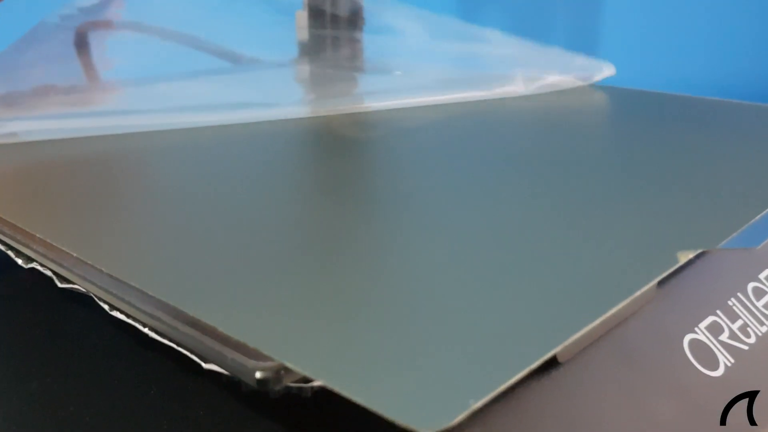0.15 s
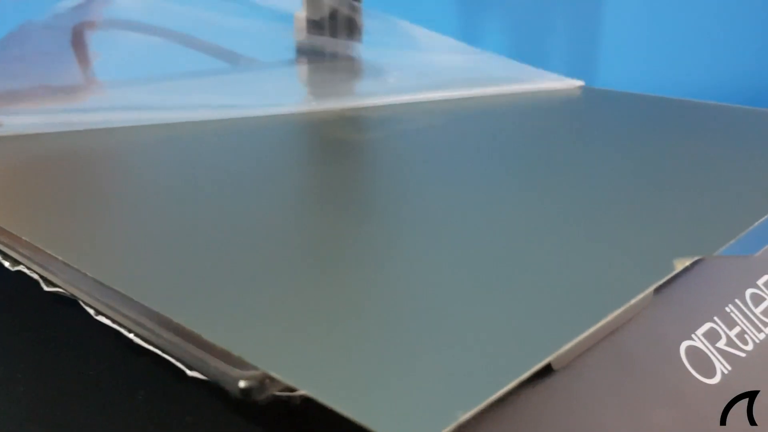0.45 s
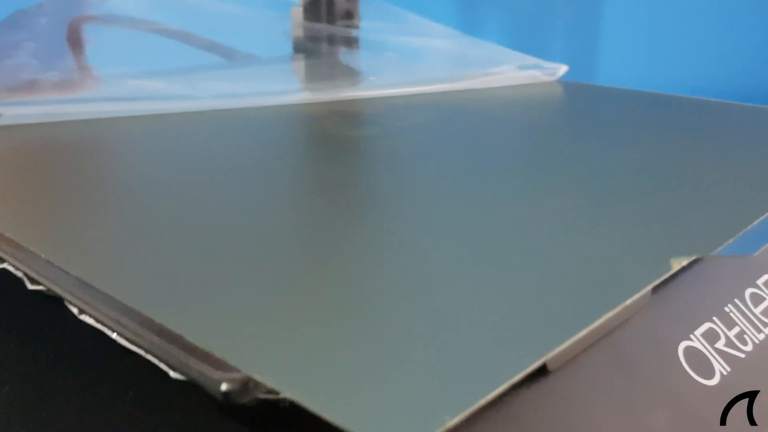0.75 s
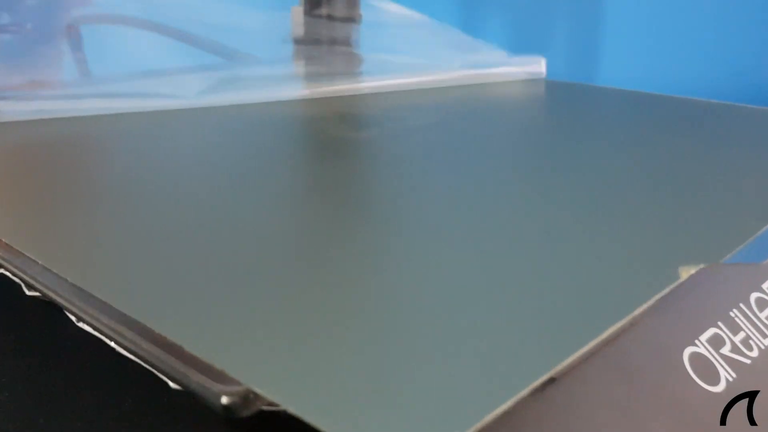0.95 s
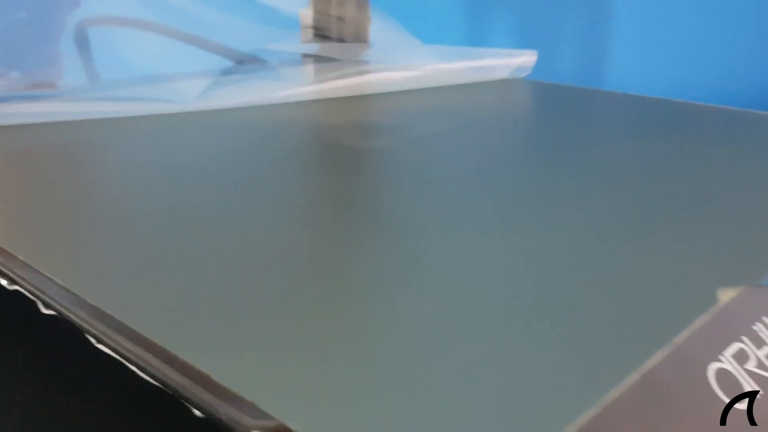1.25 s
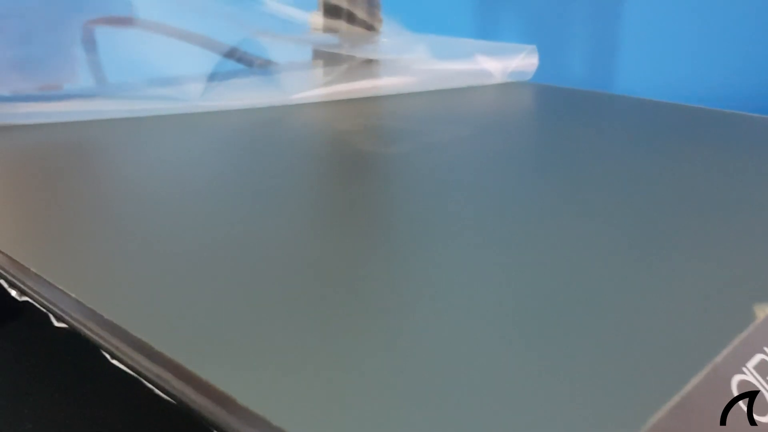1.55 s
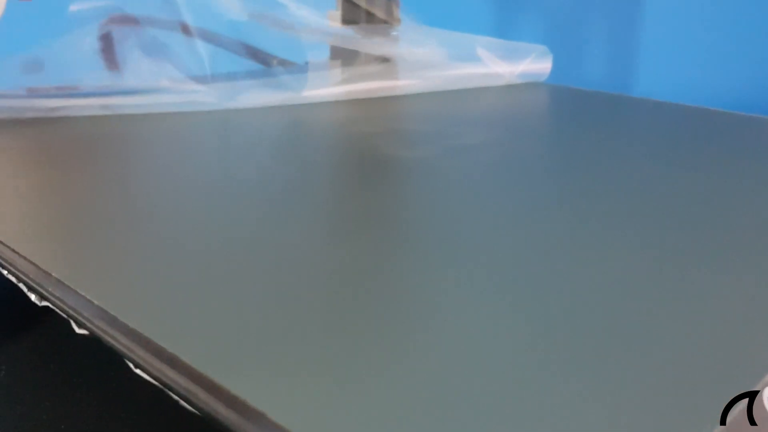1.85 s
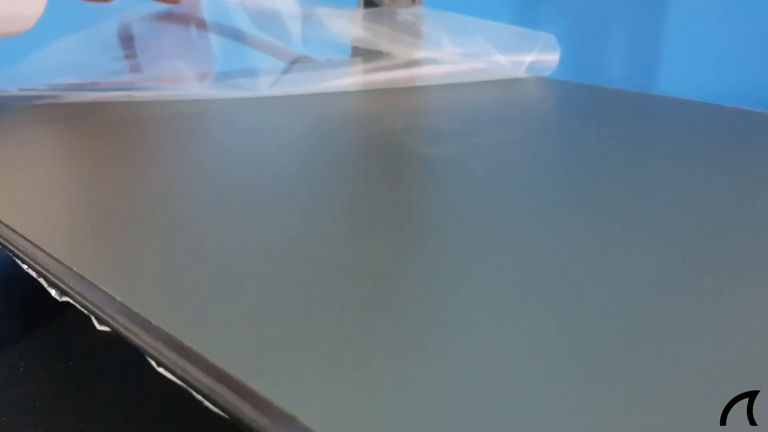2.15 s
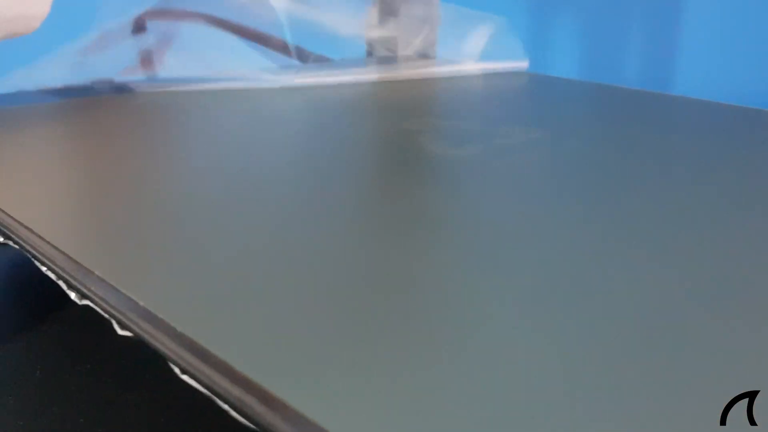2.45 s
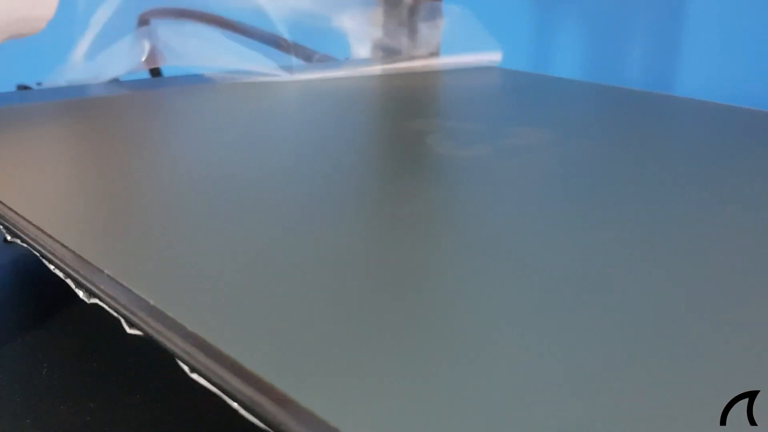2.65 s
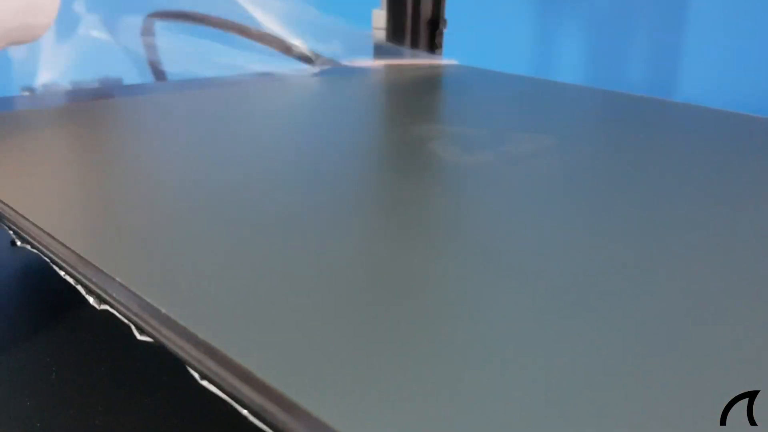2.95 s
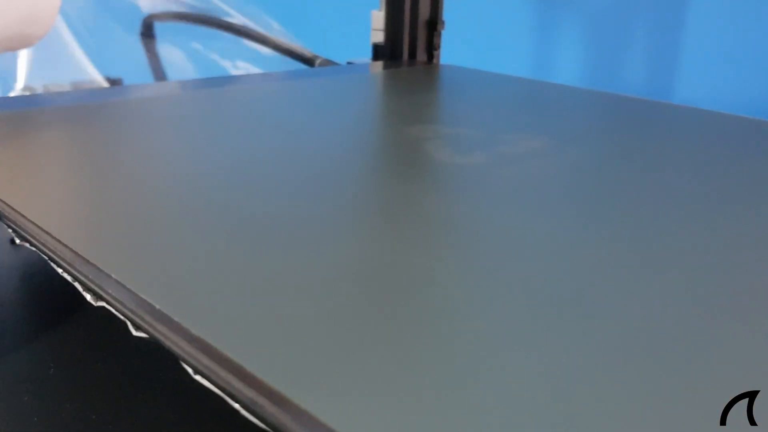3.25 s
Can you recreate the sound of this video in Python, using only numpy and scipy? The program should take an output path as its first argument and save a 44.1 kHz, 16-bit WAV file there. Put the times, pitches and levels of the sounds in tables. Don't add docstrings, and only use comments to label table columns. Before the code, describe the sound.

Thin plastic film peels off a metal sheet, close up in a small, quiet, slightly echoing room. From 0 to 1.1 s, faint hiss comes in short spurts with bright little snaps. It nearly stops around 1.2-1.6 s, then a rapid chatter of clicks comes near 1.85 s. From 2.2 to 3.1 s, peeling grows louder, crackly and rustling, with faint soft thumps; it eases before a sharp final crackle at 3.3 s.

```python
import sys
import numpy as np
from scipy import signal
from scipy.fft import rfft, irfft, next_fast_len
from scipy.io import wavfile
from scipy.ndimage import map_coordinates

SR = 44100
rng = np.random.default_rng(int(sys.argv[2]) if len(sys.argv) > 2 else 0)


def how_loud(loudness_db):
    steps = np.asarray(loudness_db, float) / 20
    return 10 ** steps


def output_pcm(signal):
    pcm = np.clip(np.atleast_2d(signal).T, -1, 1) * 32767
    wavfile.write(sys.argv[1], SR, np.round(pcm).astype(np.int16))


N = 149940

# pitch_hz, level_db
AIR_COLOUR = [(20, -11.5), (75, 5), (160, -1), (400, -6), (700, -9.5), (1500, -14), (5000, -42),
              (16000, -53)]
# pitch_hz, time to fall 60 dB_s
ROOM_DECAY = [(200, 0.36), (2000, 0.44), (12000, 0.41)]
# peak_s, peak_db, pitch_hz,
# length_cycles
THUMPS = [(.012, -48, 130, 3), (1.022, -46, 72, 3), (.222, -47, 800, 6), (.55, -48, 210, 4),
          (.035, -52, 250, 8), (.546, -47, 520, 2), (1.868, -42, 370, 5), (2.993, -35, 320, 7),
          (2.835, -40, 300, 8), (2.865, -43, 210, 4), (3.03, -41, 260, 5), (2.8, -52, 70, 3),
          (1.406, -46, 1000, 8), (2.25, -44, 330, 6)]
# time_s, pull_db, freed flap_db
PULL = [(0, -48, -23), (.3, -45.5, -26), (.47, -49.5, -14), (.69, -51.5, -15), (.78, -45, -28),
        (1.02, -49, -9.5), (1.2, -71, -15), (1.26, -60, -4), (1.58, -62.5, -5), (1.68, -54.5, -18),
        (1.96, -49.5, 1), (2.2, -41, -6.5), (2.45, -37.5, -4), (2.86, -35, -2), (3.08, -41.5, -5.5),
        (3.3, -55, 0.5), (3.335, -48, -25), (3.37, -41.5, -17)]
# start_s, length_s, buckling_db, hiss_db
SPURTS = [(0.039, 0.011, -41.5, -43), (0.139, 0.024, -49, -43.5), (0.248, 0.017, -47, -40),
          (0.282, 0.063, -41, -42.5), (0.5, 0.063, -41.5, -37.5), (0.898, 0.026, -37, -41),
          (1.054, 0.056, -39.5, -44.5), (1.107, .09, -40.5, -55), (1.392, 0.02, -38, -44.5),
          (1.64, 0.25, -41, -75), (1.822, 0.058, -35.5, -41.5), (2.095, 0.064, -37, -46),
          (2.293, 0.088, -29.5, -36.5), (2.44, 0.015, -34, -59), (2.47, 0.022, -28, -31),
          (2.559, 0.055, -28.5, -34), (2.677, 0.048, -29.5, -37.5), (3.19, 0.026, -40, -55),
          (2.998, 0.03, -31, -38.5), (3.078, 0.089, -37.5, -59), (3.33, 0.022, -17.5, -37)]
JOLT_STARTS = [.192, .716, .818, .882, 1.048, 1.988, 2.225, 2.416, 2.765, 2.985, 3.19]
# length_s, buckling_db, hiss_db
JOLTS = [(0.029, -41.5, -45), (0.014, -58, -37.5), (0.017, -39, -38), (0.013, -41, -40.5),
         (0.0078, -40.5, -42), (0.087, -37.5, -38), (0.052, -32.5, -42), (0.0041, -25.5, -52),
         (.03, -36.5, -37.5), (0.007, -26, -40), (0.003, -33, -36)]
# start_s, length_s, level_db
SLACK = [
    (1.095, 0.055, -49.5),
    (1.4, 0.035, -55),
    (2.7, 0.057, -52),
    (2.81, 0.042, -48),
    (3.06, 0.061, -47),
    (3.176, 0.033, -41.5),
    (3.344, 0.016, -31.5),
]
# pitch_hz, level_db
SLACK_COLOUR = [(400, -24), (800, -7), (1150, 0), (1700, -3), (2600, -20)]
# pitch_hz, level_db
FLAP_COLOUR = [(70, -19.5), (150, -13), (330, 0.5), (600, -5.5), (1000, 3.5), (1450, -1.5), (2200, 3.5),
               (5000, -45)]
# pitch_hz, level_db
BUCKLE_COLOUR = [(500, -58.5), (1300, -9.5), (1750, -1), (2300, 0.5), (3200, -5.5), (4800, -3.5),
                 (7000, -17.5), (14000, -20)]
# pitch_hz, level_db
GLUE_COLOUR = [(400, -16), (1200, -46), (2300, 9), (3300, 3), (5500, 4), (7000, 3), (12000, -1.5),
               (16000, -3.5)]
# peak_s, peak_db, pitch_hz, length_cycles
SNAPS = [(.0492, -30, 2460, 5), (.1958, -30, 2300, 5), (.1990, -31, 2500, 5), (.2204, -23, 2300, 6),
         (.2631, -30, 2200, 4), (.2725, -31, 2400, 4), (.3123, -26, 2450, 3), (.5071, -27, 5400, 6),
         (.5171, -27, 2600, 6), (.5325, -27, 4300, 9), (.5455, -29, 2300, 6), (.5490, -27, 2300, 6),
         (.5548, -26, 5300, 12), (.7973, -28, 5350, 6), (.8836, -30, 6100, 5), (.8857, -28, 4050, 7),
         (.9095, -29, 2400, 6), (.9250, -28, 2300, 5), (.9320, -29, 2400, 5), (1.0502, -28, 4500, 7),
         (1.0539, -29, 2450, 5), (1.2967, -43, 2090, 5), (1.7489, -32, 2150, 5), (1.7688, -31, 2220, 5),
         (1.7836, -32, 4670, 6), (1.8282, -28, 2450, 3), (1.9266, -27, 2330, 3), (1.9382, -27, 1490, 4),
         (1.9781, -22, 1900, 2.5), (1.9912, -25, 4300, 4), (1.4058, -32, 2100, 6), (1.4064, -37, 4200, 6),
         (1.8099, -29, 2650, 3), (1.8122, -29, 2690, 3),
         (2.1770, -21, 1800, 3), (2.2259, -21, 3600, 3), (2.2268, -17, 2400, 7),
                (2.3335, -22, 2400, 5), (2.4177, -17, 4700, 4), (2.4182, -21, 1900, 3),
                (2.4349, -18.5, 2700, 3.5), (2.4529, -22, 2260, 6), (2.5061, -21, 6500, 8),
                (2.5382, -18, 4200, 4), (2.5395, -23, 3000, 4), (2.6060, -17, 5550, 9),
                (2.7055, -22, 2100, 6), (2.7334, -19, 2820, 7), (2.7550, -23, 5000, 8),
                (2.7675, -22, 2200, 5), (2.7765, -21, 6900, 12), (2.8305, -24, 1000, 4),
                (2.9115, -23, 4570, 4), (2.9863, -15, 2250, 3), (2.9885, -25, 1150, 6),
                (3.0720, -28, 1150, 7), (3.1090, -28, 1120, 4), (3.1200, -28, 2000, 5),
                (3.1329, -25, 5800, 6), (3.1490, -27, 2000, 6), (3.1715, -28, 4700, 6),
                (3.1922, -23, 1900, 3), (3.1935, -23, 5700, 8), (3.2000, -27, 1150, 7),
                (3.3072, -34, 4260, 5), (3.3139, -34, 1140, 4), (3.3145, -35, 4400, 8)]
# pitch_hz, level_db
SNAP_EDGE = [(300, -25), (900, -18), (2000, 6), (6000, 8), (9000, -58), (16000, -44)]
# pitch_hz, level_db
PORT_COLOUR = [(3000, -2.5), (3550, 2.5), (4100, 0), (6900, 1), (8000, -11), (8800, -6), (12500, 2.5),
               (15700, -1.5)]
# pitch_hz, level_db
LEFT_OVER_RIGHT = [(60, -1.5), (130, 2.5), (290, 2), (640, 1.5), (1410, -4), (3100, -5), (6820, -1.5),
                   (15000, -9)]

LAG_S, LAG_SPREAD_S = .0001, .00006
SNAP_LAG_S = .00004
RELEASE_S = 0.13


def unit(x):
    return x / np.sqrt(np.mean(x ** 2) + 1e-20)


def along(points, hz):
    f, v = np.transpose(points)
    return np.interp(np.log(hz + 1), np.log(f + 1), v)


def wobble(rate_hz):
    return map_coordinates(rng.standard_normal(4000), [np.arange(N) * min(rate_hz, 1000) / SR])


def coloured(x, points):
    log_gain = np.log(how_loud(along(points, np.fft.rfftfreq(4096, 1 / SR))))
    cepstrum = irfft(log_gain)
    cepstrum[1:2048] *= 2
    cepstrum[2049:] = 0
    response = irfft(np.exp(rfft(cepstrum)))
    return signal.fftconvolve(x, response[None], axes=1)[:, :N]


def slips(count, scatter_db, smear):
    at, place, sign, luck = rng.random((4, count))
    spread = LAG_SPREAD_S * np.sqrt(12) * (place - .5)
    half_lag = (LAG_S + spread) * SR / 2
    size_db = np.minimum(-scatter_db * np.log(luck + 1e-9), 4.0 * scatter_db)
    size = np.sign(sign - .5) * how_loud(size_db)
    pair = []
    for side in (1, -1):
        sample = np.clip(at * N + side * half_lag, 0, N - 1).astype(int)
        pair.append(np.bincount(sample, size, N))
    return unit(unit(np.array(pair)) + smear * rng.standard_normal((2, N)))


def rings(rows, crack):
    edge_s, sag = .012, 0.083
    out = np.zeros((2, N + SR))
    t = np.arange(SR // 8) / SR
    for peak_s, db, hz, cycles in rows:
        burst = how_loud(-60 * t / edge_s) * rng.standard_normal(len(t))
        edge = coloured(np.pad(burst[None], ((0, 0), (20, 0))), SNAP_EDGE)[0]
        lag_s = np.clip(rng.normal(SNAP_LAG_S, LAG_SPREAD_S / 2), -9 / SR, 9 / SR)
        swell_s = cycles / hz / 3
        start = max(round((peak_s - swell_s) * SR) - 10, 0)
        for port, late_s in enumerate([lag_s, 0]):
            since = np.maximum(t - 10 / SR - late_s, 0)
            u = since / swell_s
            swell = (np.e * u * np.exp(-u)) ** 2
            ring = swell * np.sin(2 * np.pi * hz * since * (1 + sag * (1 - u / 2) / 2))
            late_edge = edge[10 - round(late_s * SR):][:len(t)]
            out[port, start:][:len(t)] += how_loud(db) * (ring + crack * late_edge)
    return out[:, :N]


def air():
    shared, left, right = rng.standard_normal((3, N))
    sway_db = 2.5 * wobble(7)
    return how_loud(-63 + sway_db) * unit(coloured(np.array([left, right]) + shared, AIR_COLOUR))


def room(x):
    hop = SR // 5
    out = np.zeros((2, N + 2 * SR))
    fade = np.hanning(2 * hop + 1)[:-1]
    x = np.pad(x, ((0, 0), (hop, 2 * hop)))
    for at in range(0, N + hop, hop):
        hz, t, z = signal.stft(rng.standard_normal((2, SR // 3)), SR, nperseg=256)
        alike = np.exp(-hz / 1220)[:, None]
        z = np.array([z[0], alike * z[0] + np.sqrt(1 - alike ** 2) * z[1]])
        decay = how_loud(-60 * t / along(ROOM_DECAY, hz)[:, None])
        tail = signal.istft(z * decay, SR, nperseg=256)[1]
        tail = tail / np.linalg.norm(tail[0])
        wet = signal.fftconvolve(x[:, at:at + 2 * hop] * fade, tail, axes=1)
        out[:, at + 150:][:, :wet.shape[1]] += wet
    return out[:, hop:hop + N]


def sheet_thumps():
    return rings(THUMPS, crack=0)


def effort():
    t = np.arange(N) / SR
    time_s, pull_db, flap_db = np.transpose(PULL)
    pull = how_loud(np.interp(t, time_s, pull_db))
    jolts = [(start_s, *row) for start_s, row in zip(JOLT_STARTS, JOLTS)]
    start, length, buckle_db, hiss_db = np.transpose(SPURTS + jolts)[..., None]
    is_spurt = np.arange(len(start))[:, None] < len(SPURTS)
    rise_s = np.where(is_spurt, .5 * length, .0015)
    release = how_loud(-60 * np.maximum(t - start - length, 0) / RELEASE_S)
    shape = np.clip((t - start) / rise_s, 0, 1) * release
    hiss = np.sqrt((how_loud(6.5) * pull) ** 2 + ((how_loud(hiss_db + 5.0) * shape) ** 2).sum(0))
    buckle = np.sqrt((how_loud(-4.0) * pull) ** 2 + ((how_loud(buckle_db) * shape) ** 2).sum(0))
    flap = how_loud(np.interp(t, time_s, flap_db)) * np.hypot(pull, 0.85 * buckle)
    return hiss, buckle, flap


def slack_rasp():
    start, length, db = np.transpose(SLACK)[..., None]
    t = np.arange(N) / SR
    rise = np.clip((t - start) / (0.52 * length), 0, 1)
    shape = rise * how_loud(db - 60 * np.maximum(t - start - length, 0) / RELEASE_S)
    rasp = unit(coloured(slips(count=3000, scatter_db=2.5, smear=0.1), SLACK_COLOUR))
    return shape.sum(0) * how_loud(3.2 * wobble(90)) * rasp


def flap_rustle(flap, jerk):
    rustle = unit(coloured(slips(count=3000, scatter_db=1.5, smear=0.36), FLAP_COLOUR))
    return flap * how_loud(1.2 * jerk + 2.2 * wobble(40)) * rustle


def buckling(buckle, jerk):
    wide_colour = BUCKLE_COLOUR[:5] + [(5000, -30)]
    fine_colour = [(2000, -30)] + BUCKLE_COLOUR[4:]
    wide = unit(coloured(slips(count=3500, scatter_db=3.3, smear=.25), wide_colour))
    wide = how_loud(2.5 * wobble(110)) * wide
    fine = unit(coloured(slips(count=7000, scatter_db=3.5, smear=.25), fine_colour))
    fine = how_loud(2.5 * wobble(140)) * fine
    rip = unit(coloured(slips(count=30000, scatter_db=3.5, smear=.25), BUCKLE_COLOUR))
    dense = np.clip(buckle / how_loud(-24), 0, 1)
    crackle = how_loud(0.9 * jerk) * (0.8 * wide + 0.55 * fine)
    return buckle * (np.sqrt(1 - dense) * crackle + np.sqrt(dense) * rip)


def glue_hiss(hiss, jerk):
    glue = unit(coloured(slips(count=40000, scatter_db=5.0, smear=0.55), GLUE_COLOUR))
    return hiss * how_loud(1.54 * jerk + 0.46 * wobble(200)) * glue


def chatter(count):
    start_s, first_gap_s, gap_grows_s = 1.8365, .00195, .0001
    k = np.arange(count)
    luck = rng.standard_normal((count, 3))
    peak_s = start_s + first_gap_s * k + gap_grows_s * k * (k - 1) / 2 + .0001 * luck[:, 0]
    db = np.linspace(-25, -17, count) + 0.5 * luck[:, 1]
    hz = 2200 * (1 + 0.16 * luck[:, 2])
    return list(zip(peak_s, db, hz, np.full(count, 2.2)))


def film_snaps():
    return how_loud(3.0) * rings(SNAPS + chatter(count=15), crack=.3)


def film():
    hiss, buckle, flap = effort()
    jerk = wobble(70)
    loose = slack_rasp() + flap_rustle(flap, jerk)
    return loose + buckling(buckle, jerk) + glue_hiss(hiss, jerk) + film_snaps()


def scene():
    near = film()
    return air() + how_loud(-5.5) * room(near) + sheet_thumps() + near


def roll_off(x):
    return signal.sosfilt(signal.butter(12, 16980, fs=SR, output="sos"), x)


def record(dry):
    size = next_fast_len(N + 8192)
    hz = np.fft.rfftfreq(size, 1 / SR)
    tilt_db = along(LEFT_OVER_RIGHT, hz) / 2
    dip = 1 - .5 * np.exp(-((hz - 3500) / 280) ** 2)
    spectrum = rfft(coloured(dry, PORT_COLOUR), size)
    spectrum = spectrum * how_loud([tilt_db, -tilt_db]) * dip * (hz < 15850)
    mix = irfft(spectrum, size)[:, :N]
    return roll_off(mix)


dry = scene()
out = record(dry)
output_pcm(out)
```